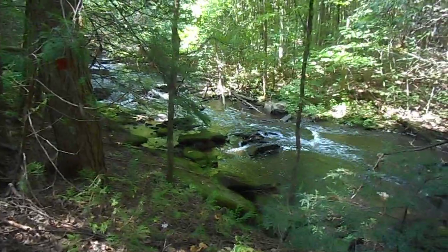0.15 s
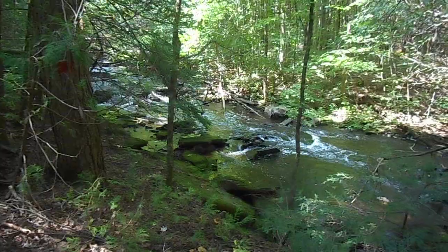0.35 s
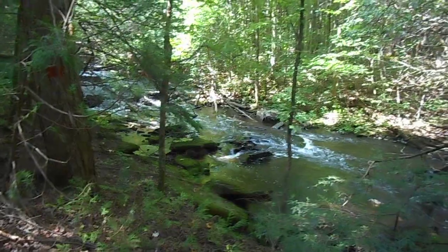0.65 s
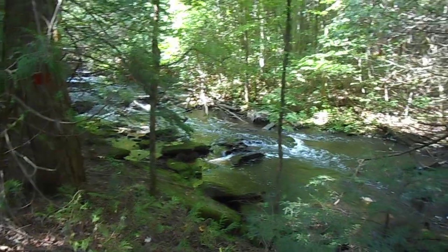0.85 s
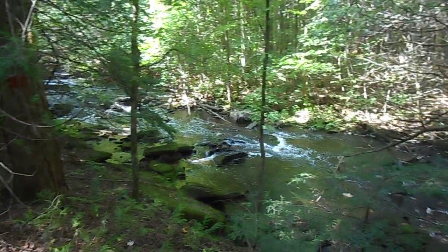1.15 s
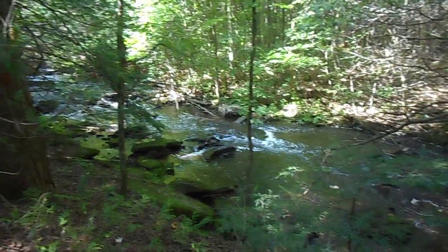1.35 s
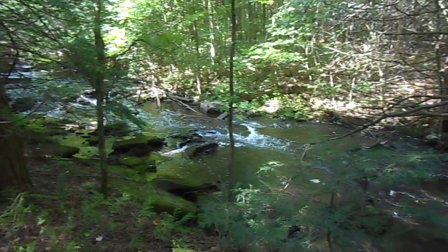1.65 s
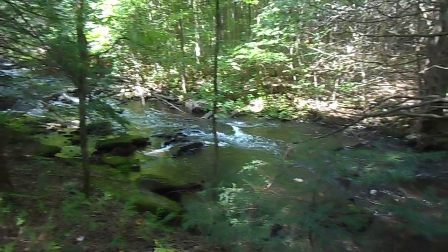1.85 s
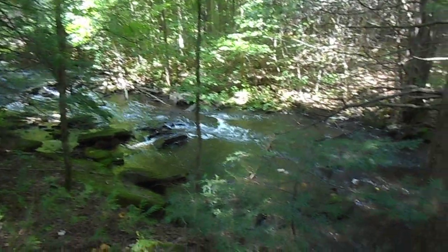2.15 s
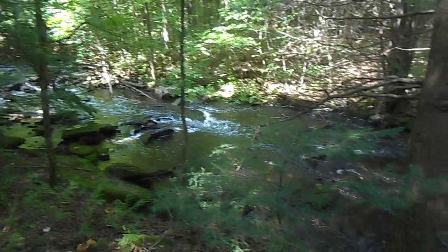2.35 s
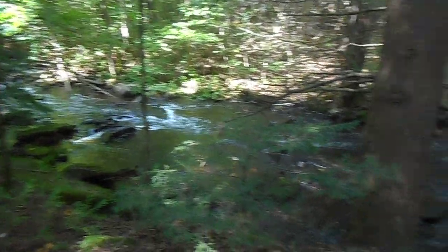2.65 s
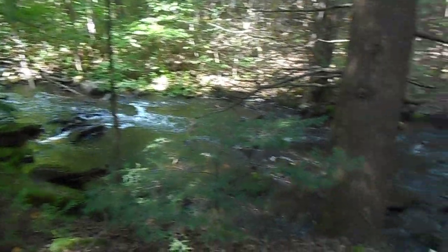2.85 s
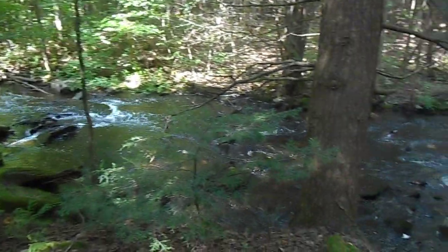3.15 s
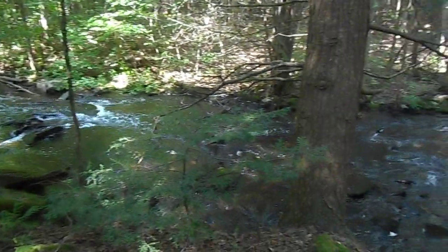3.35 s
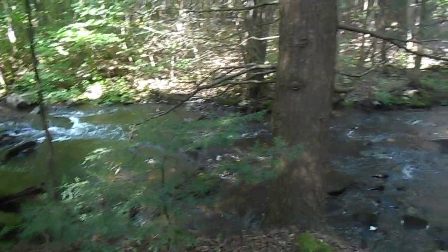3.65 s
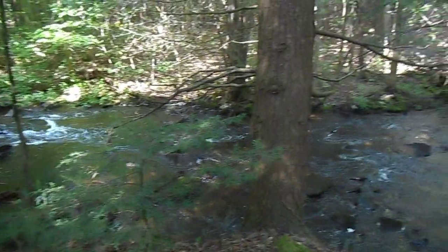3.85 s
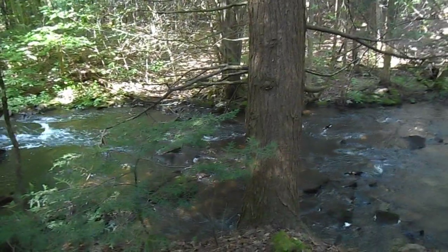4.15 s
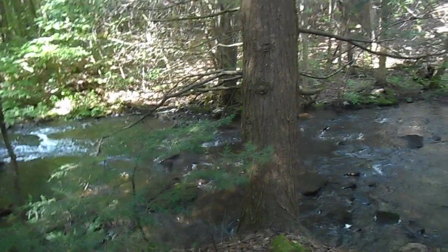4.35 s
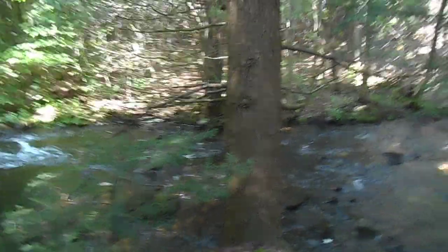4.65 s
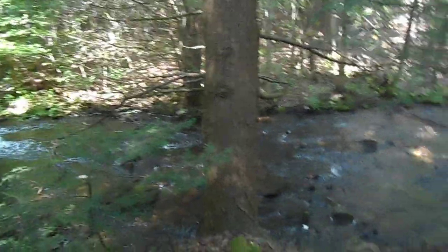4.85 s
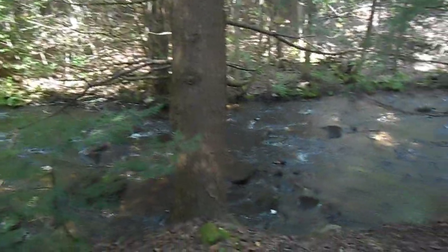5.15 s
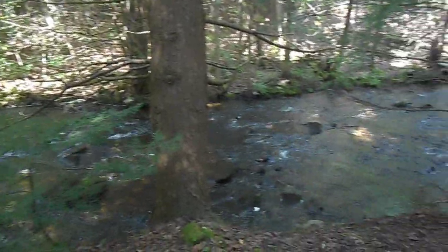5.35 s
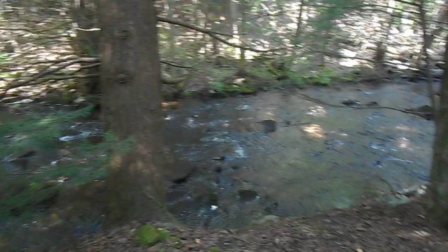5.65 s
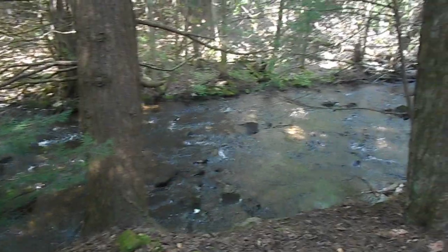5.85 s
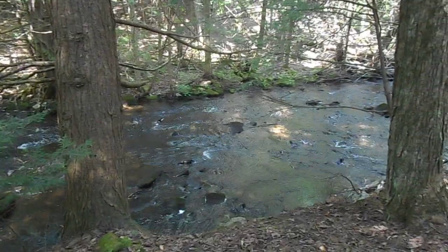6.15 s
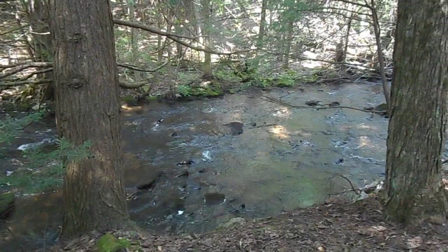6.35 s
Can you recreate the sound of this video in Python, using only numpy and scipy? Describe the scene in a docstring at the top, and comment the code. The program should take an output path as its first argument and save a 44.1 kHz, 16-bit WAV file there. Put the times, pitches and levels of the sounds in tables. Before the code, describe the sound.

Steady bubbling rush of a rocky creek, with tiny drops plinking nearby, faint handling noise and a few dry ticks.

```python
"""A small forest creek over riffles and boulders, heard from the bank on a hand-held camera's microphone.
From the start, countless bubbles merge into an even gurgle and fizz, and the hand rubs and bumps the
camera. Within the first second near drops begin to ring; then pockets between the stones gulp air.
Around 3 s the hand settles, a dry tick sounds and the microphone swings from the white water towards
the calmer shallows. It faces them by 5.5 s; a last drop and a few more ticks follow."""
import sys
import numpy as np
from scipy import signal
from scipy.fft import rfft, irfft, next_fast_len
from scipy.io import wavfile
from scipy.ndimage import uniform_filter1d, map_coordinates

SR = 44100
rng = np.random.default_rng(int(sys.argv[2]) if len(sys.argv) > 2 else 0)


def unload_wav(signal):
    """Save mono or channel-first audio to the path in sys.argv[1] as 16-bit WAV at rate SR, clipped to [-1, 1]."""
    wavfile.write(
        sys.argv[1],
        SR,
        np.round(np.clip(np.atleast_2d(signal).T, -1, 1) * 32767).astype(np.int16),
    )


N = 287091
TIME_S = np.arange(N) / SR


def amp(db):
    """Decibels to gain."""
    return 10 ** (np.asarray(db) / 20)


def unit(x):
    """Scale to rms 1."""
    return x / np.sqrt(np.mean(x ** 2) + 1e-20)


def wobble(rate_hz):
    """A smooth random curve through rate_hz knots a second."""
    knots = rng.standard_normal(int(N * rate_hz / SR) + 4)
    return map_coordinates(knots, [TIME_S * rate_hz])


def filtered(x, response):
    """Filter x by a gain given as a function of frequency."""
    size = next_fast_len(N + SR // 2)
    return irfft(rfft(x, size) * response(np.fft.rfftfreq(size, 1 / SR)), size)[:N]


def coloured(x, spectrum):
    """Shape x by (freq_hz, level_db) points on a log axis, at rms 1."""
    freq_hz, level_db = np.transpose(spectrum)
    return unit(filtered(x, lambda hz: amp(np.interp(np.log(hz + 1), np.log(freq_hz), level_db))))


def band(x, low_hz, high_hz):
    """Causal band-pass with soft edges."""
    return filtered(x, lambda hz: (1j * hz / (low_hz + 1j * hz) * high_hz / (high_hz + 1j * hz)) ** 2)


def placed(start_s, waves):
    """Mix the rows of waves into one track, each at its start time."""
    index = (start_s * SR).astype(int)[:, None] + np.arange(waves.shape[1])
    return np.bincount(index.ravel(), waves.ravel(), N)[:N]


def rings(start_s, gain, pitch_hz, cycles, rise=0, samples=1200):
    """Damped sines that die by 60 dB in so many cycles while their pitch climbs by the fraction rise."""
    t = np.arange(samples) / SR
    age = t * (pitch_hz / cycles)[:, None]
    phase = 2 * np.pi * pitch_hz[:, None] * t * (1 + rise * age / 2)
    envelope = (1 - np.exp(-phase)) * np.exp(-np.log(1000) * age)
    return placed(start_s, gain[:, None] * envelope * np.sin(phase))


def bursts(start_s, gain, t60_s, samples=2000):
    """Short bursts of noise, each dying by 60 dB in t60_s."""
    decay = np.exp(-np.log(1000) * np.arange(samples) / SR / t60_s)
    return placed(start_s, gain[:, None] * decay * rng.standard_normal((len(start_s), samples)))


def far_bubbles(patchy_db, bands, frames):
    """Distant bubbles merge into noise that swells in patches, so many bands wide and frames long."""
    cells = signal.stft(rng.standard_normal(N), nperseg=512)[2]
    patches = uniform_filter1d(rng.standard_normal(cells.shape), bands, axis=0)
    patches = unit(uniform_filter1d(patches, frames, axis=1))
    return unit(signal.istft(cells * amp(patchy_db * patches))[1][:N])


def near_bubbles(low_hz, high_hz, cycles, spread_db, rise, count, samples):
    """Bubbles of random size and distance ring singly, each rising in pitch as it nears the surface."""
    when, smallness, distance = rng.random((count, 3)).T
    pitch_hz = low_hz * (high_hz / low_hz) ** smallness
    gain = pitch_hz * amp(-spread_db * np.log(distance + 0.002))
    return unit(rings(when * N / SR, gain, pitch_hz, cycles, rise, samples))


# Where the microphone points: time_s, shallows_share (0-1)
MIC_AIM = [(0, 0), (2.3, 0.16), (3.6, 0.57), (4.8, 0.5), (5.5, 0.92), (6.51, 0.98)]


def shallows_share():
    """How far the microphone has turned from the falls (0) to the shallows (1)."""
    time_s, share = np.transpose(MIC_AIM)
    return np.interp(TIME_S, time_s, share)


# Tone of the falls and of the shallows, from the bank: freq_hz, level_db (relative)
FALLS_SPECTRUM = [(40, -41), (130, -27.5), (260, -12), (420, -15), (620, -1.5), (770, 1), (920, -.5),
                  (1070, 1), (1320, -4.5), (1620, -3), (1950, -10), (2350, -3.5), (4000, -26), (9000, -60)]
SHALLOWS_SPECTRUM = [(40, -40.5), (75, -29.5), (105, -21.5), (160, -21), (290, -10.5), (450, -9), (620, -4),
                     (770, -1.5), (940, 1.5), (1350, -1.2), (1550, -5), (2000, -4), (4000, -17.5),
                     (9000, -57)]


def gurgle(level_db=-33, turn_loss_db=1.1):
    """Crowds of large bubbles: deep under the falls over the boulders, lighter in the shallows."""
    share = shallows_share()
    water = np.zeros(N)
    for spectrum, weight in ((FALLS_SPECTRUM, 1 - share), (SHALLOWS_SPECTRUM, share)):
        near = near_bubbles(448, 3210, cycles=13.7, spread_db=-0.2, rise=0.12, count=4000, samples=1000)
        far = far_bubbles(patchy_db=1.06, bands=3, frames=16)
        water += np.sqrt(weight) * coloured(far + amp(-11.5) * near, spectrum)
    return amp(level_db - turn_loss_db * share + 0.22 * wobble(rate_hz=23)) * water


# Fizz of the riffles, from the bank: freq_hz, level_db (relative)
SPRAY_SPECTRUM = [(700, -28.5), (1600, 1), (2450, -0.5), (3200, -.5), (4200, -4.5), (5800, -10),
                  (7300, -16), (8700, -20.5), (10400, -25), (11000, -44)]


def spray(level_db=-33.5, turn_loss_db=2.5):
    """Tiny bubbles and droplets fizz on the riffles; more directional, they fade further off axis."""
    near = near_bubbles(1768, 9570, cycles=22.4, spread_db=2.5, rise=0.14, count=8000, samples=400)
    far = far_bubbles(patchy_db=0.16, bands=12, frames=9)
    fizz = coloured(far + amp(-10.5) * near, SPRAY_SPECTRUM)
    return amp(level_db - turn_loss_db * shallows_share() + 0.15 * wobble(rate_hz=18)) * fizz


# Slides of the hand on the camera body: start_s, length_s, level_db
HAND_SLIDES = [(0.317, 0.23, -54), (0.817, 0.08, -51), (1.182, .15, -59), (1.45, 0.06, -54),
               (2.22, 0.086, -55), (2.44, .13, -60), (3.395, .11, -42.5), (3.61, 0.084, -61),
               (4.28, .13, -57.5)]


def hand_friction(restless_db=-62.5, settled_db=-74, settle_s=2.7, settle_span_s=0.15):
    """Strength of the hand's friction: a fidget that settles, and slides that rise, hold and let go."""
    attack_s, release_s = 0.017, 0.04
    settled = (1 + np.tanh((TIME_S - settle_s) / settle_span_s)) / 2
    fidget_db = restless_db + (settled_db - restless_db) * settled + 2.6 * wobble(rate_hz=9.5)
    power = amp(fidget_db) ** 2
    for start_s, length_s, level_db in HAND_SLIDES:
        age_s = TIME_S - start_s
        slide = np.clip(np.minimum(age_s / attack_s, 1 - (age_s - length_s) / release_s), 0, 1)
        power += (amp(level_db) * slide) ** 2
    return np.sqrt(power)


# Tone of a light rub and of a firm one, right at the microphone: freq_hz, level_db (relative)
RUMBLE_SPECTRUM = [(10, -11), (30, 2), (60, 2), (130, -1), (250, -7.5), (400, -2.5), (800, -48)]
SCRAPE_SPECTRUM = [(30, -24), (80, -6), (130, 2), (300, -3), (420, -8), (800, -44)]


def hand_rubs(scrape_from_db=-50.5):
    """Handling noise: the shifting hand rumbles, and scrapes when it grips harder."""
    friction = hand_friction()
    scrape_share = 1 / (1 + (amp(scrape_from_db) / friction) ** 3.7)
    rumble = coloured(rng.standard_normal(N) * amp(1.5 * wobble(rate_hz=60)), RUMBLE_SPECTRUM)
    scrape = coloured(rng.standard_normal(N) * amp(1.4 * wobble(rate_hz=90)), SCRAPE_SPECTRUM)
    return friction * (np.sqrt(1 - scrape_share) * rumble + np.sqrt(scrape_share) * amp(-0.5) * scrape)


# Soft knocks on the camera body: start_s, level_db (relative), pitch_hz
BODY_BUMPS = [(.404, -41, 110), (0.421, -36, 220), (0.84, -40.5, 125), (.925, -43, 75), (2.285, -42, 150),
              (2.454, -46, 130), (2.77, -46, 120), (3.388, -37, 240), (3.51, -26, 284), (4.341, -42, 170),
              (4.402, -48, 130)]


def hand_bumps():
    """The hand bumps the camera, whose body thuds for about three cycles."""
    start_s, level_db, pitch_hz = np.transpose(BODY_BUMPS)
    thuds = rings(start_s, amp(level_db + 12), pitch_hz, cycles=3.1, samples=2400)
    return band(thuds, low_hz=60, high_hz=600)


# Single drops close to the microphone: start_s, level_db (relative), pitch_hz
NEAR_DROPS = [(0.645, -36, 6660), (1.005, -29.5, 3120), (1.612, -35, 7640), (1.714, -26.5, 3530),
              (1.852, -30, 2670), (2.1, -37, 6500), (2.221, -27, 4200), (2.571, -29, 4840),
              (2.652, -33, 6200), (2.969, -30, 3600), (3.339, -35, 7200), (5.943, -28, 3400)]


def drops():
    """Drops thrown up near the bank splash and each trap one briefly ringing bubble."""
    start_s, level_db, pitch_hz = np.transpose(NEAR_DROPS)
    splash = band(bursts(start_s, amp(level_db + 7.5), t60_s=0.027), low_hz=2200, high_hz=3200)
    plinks = rings(start_s, amp(level_db + 4.5), pitch_hz, cycles=42, rise=0.24)
    return plinks + band(splash, low_hz=300, high_hz=6000)


# Gulping pockets out in the creek: peak_s, level_db, pitch_hz
POCKET_GULPS = [(1.1, -42, 1610), (1.55, -41, 1620), (2.12, -39.5, 1680), (5.2, -43, 1410)]


def gulps(width_s=0.074):
    """A pocket between stones swallows air: a brief swell of bubbles of nearly one size."""
    swells = np.zeros(N)
    for peak_s, level_db, pitch_hz in POCKET_GULPS:
        cloud = near_bubbles(0.95 * pitch_hz, 1.05 * pitch_hz, cycles=70, spread_db=1.5, rise=0.05,
                             count=900, samples=2000)
        swells += amp(level_db) * np.exp(-((TIME_S - peak_s) / width_s) ** 2) * cloud
    return swells


# Small ticks in the foreground: start_s, level_db (relative), pitch_hz
DRY_TICKS = [(3.2655, -22.5, 8650), (6.106, -30.5, 8100), (6.4075, -18, 1510), (6.4087, -23, 2200),
             (6.411, -19, 2700)]


def ticks():
    """Dry ticks that die within a few cycles and trail a short dull crunch."""
    start_s, level_db, pitch_hz = np.transpose(DRY_TICKS)
    clicks = rings(start_s, amp(level_db + 5.5), pitch_hz, cycles=6.8)
    crunch = band(bursts(start_s, amp(level_db + 7), t60_s=0.02), low_hz=700, high_hz=2600)
    return band(clicks, low_hz=302, high_hz=16000) + band(crunch, low_hz=200, high_hz=4000)


def scene():
    """The creek and the handling noise as they reach one microphone on the bank."""
    return (gurgle() + spray() + hand_rubs() + hand_bumps() + drops() + gulps() + ticks())[None]


def record(dry):
    """The camera rolls the top treble off and keeps nothing above its band limit."""
    rolloff_hz, limit_hz = 9600, 10800
    return filtered(dry[0], lambda hz: (hz < limit_hz) / (1 + (hz / rolloff_hz) ** 14))[None]


dry = scene()
out = record(dry)
unload_wav(out)
```